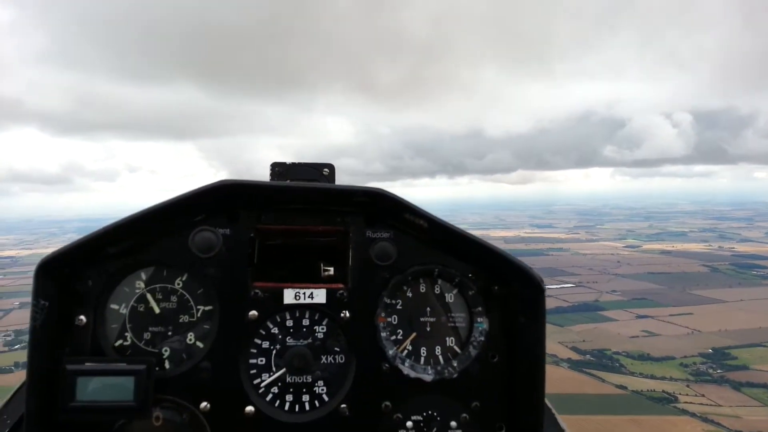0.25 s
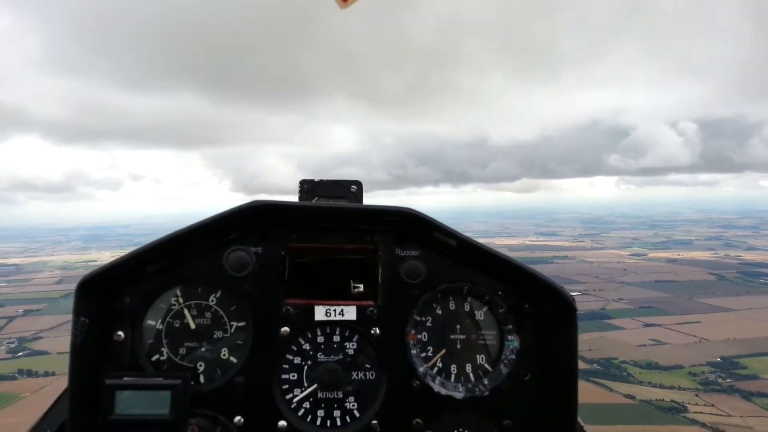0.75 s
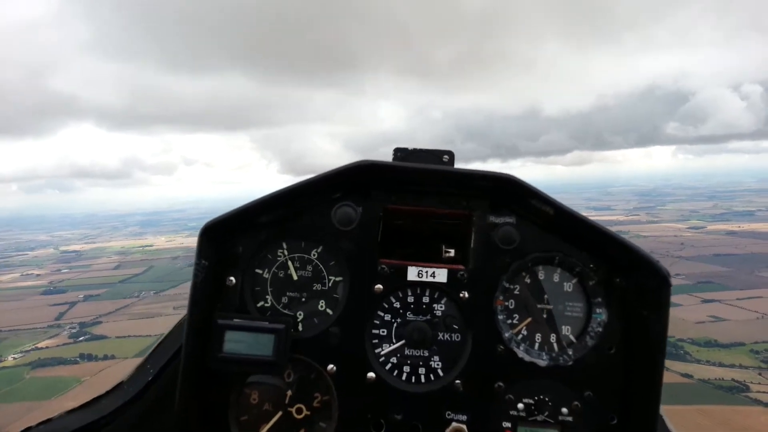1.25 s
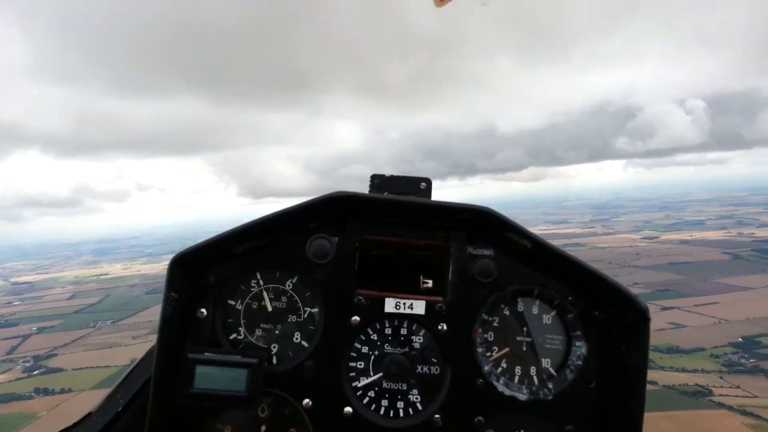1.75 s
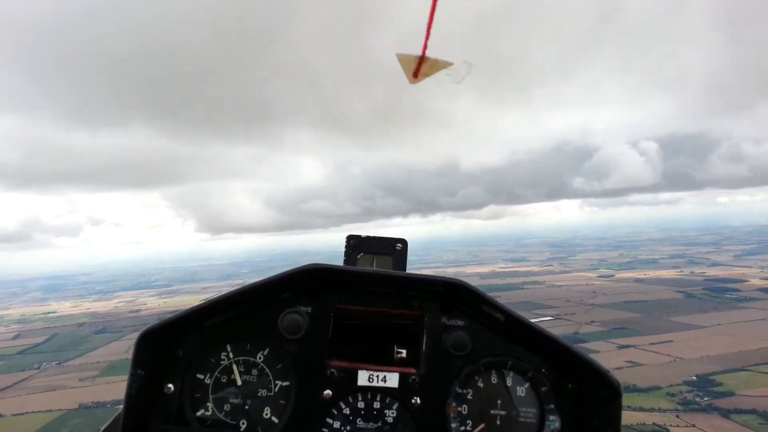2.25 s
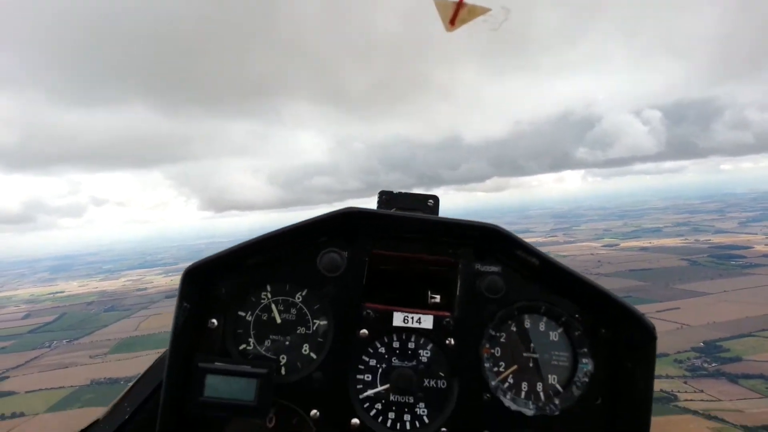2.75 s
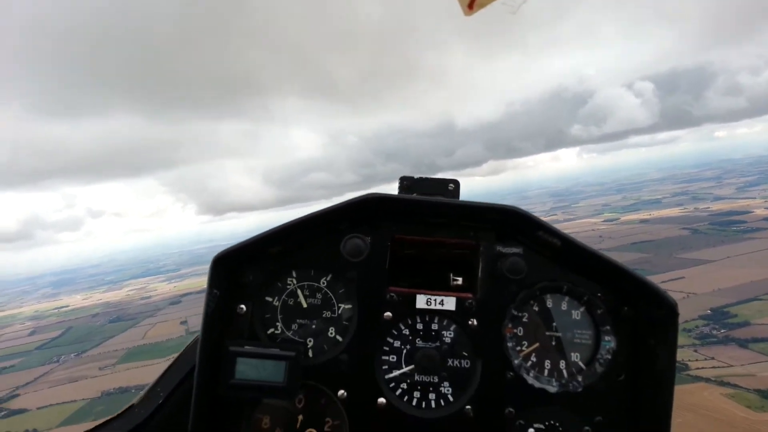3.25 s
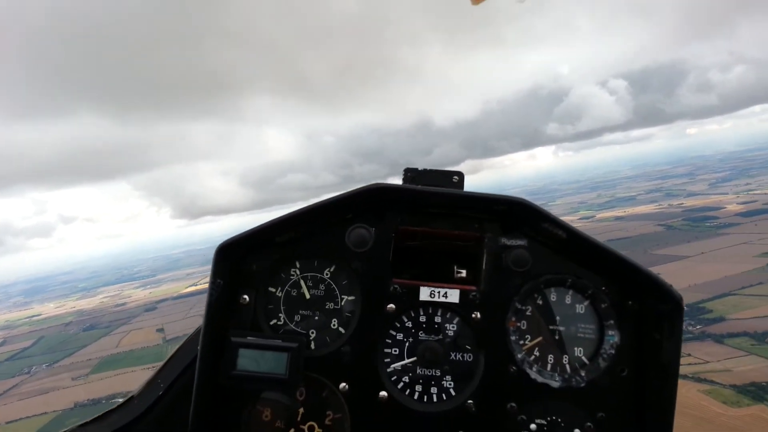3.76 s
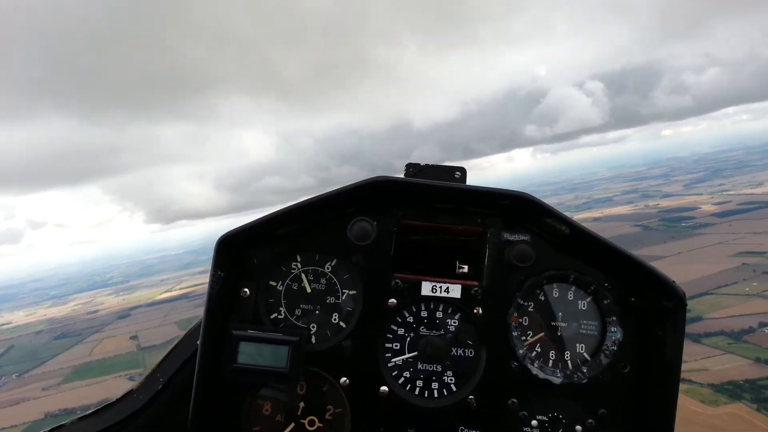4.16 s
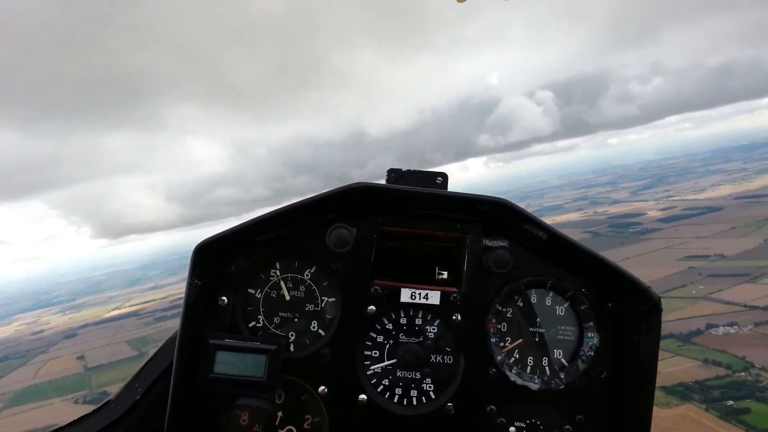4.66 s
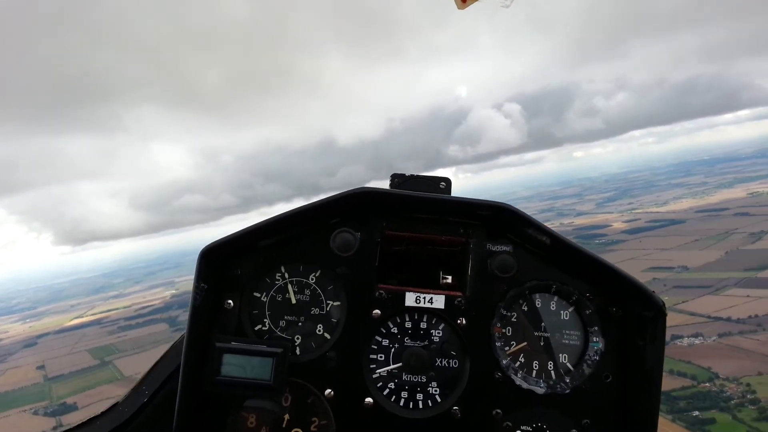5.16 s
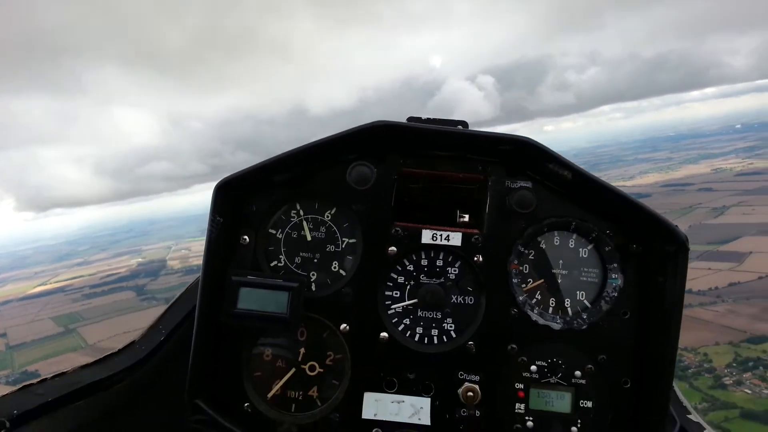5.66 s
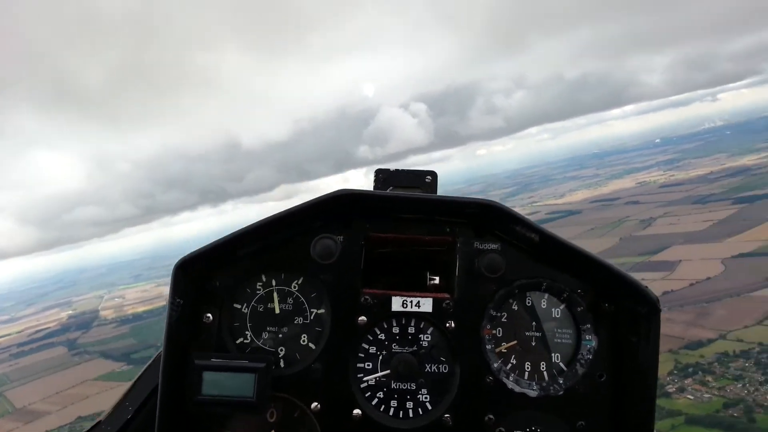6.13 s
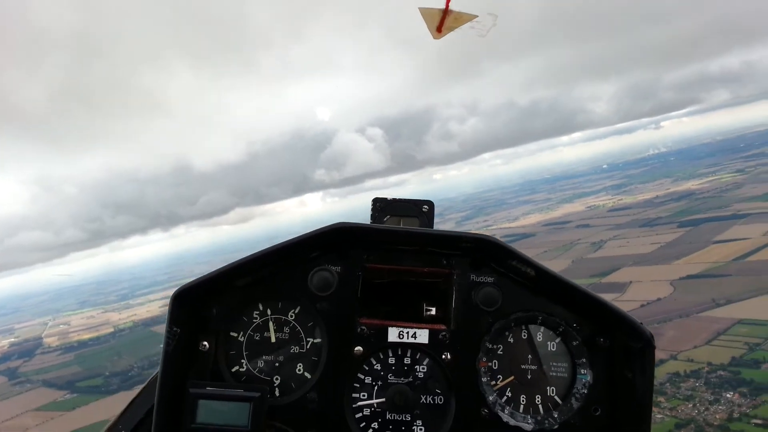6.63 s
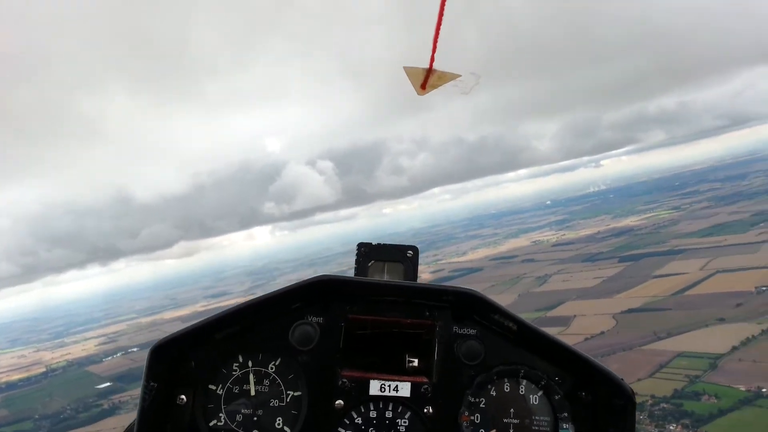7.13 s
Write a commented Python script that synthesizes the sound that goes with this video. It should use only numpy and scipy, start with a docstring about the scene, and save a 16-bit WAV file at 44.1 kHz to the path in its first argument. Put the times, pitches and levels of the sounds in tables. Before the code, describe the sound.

Inside a glider cockpit in a gentle turn, air rushes over the canopy from the first moment to the end, about 7.4 seconds, with no engine. It is a full, turbulent noise, strongest in the mids, with a soft buffeting roar below and a steady hiss from the canopy seals above. Small gusts and brief dips ripple through it, with a clear sag near 2.3 seconds; the rush grows very slightly overall. Underneath, a hollow, breathy low tone around 300 to 400 hertz is weak at first. From about 1.3 to 4.6 seconds it swells in crowded, irregular surges, catching and letting go quickly, then eases to sparse, fainter pulses. The handheld stereo microphones are inside the cabin, close and boxy; as they drift, narrow bands rise and fade, subtly changing the colour between left and right.

```python
"""Inside a glider in a gentle turn: from the start, air rushes over the canopy, turbulent noise shaped
by the cockpit's resonances; the canopy seals hiss.
A hollow low tone, noise ringing in a cavity blown by the slipstream, is weak at first, swells in
crowded surges from about 1.3 s to 4.6 s, then eases to sparser, weaker ones.
Two hand-held microphones hear the air, the right a moment before the left."""
import sys
import numpy as np
from scipy import signal
from scipy.fft import rfft, irfft, next_fast_len
from scipy.io import wavfile
from scipy.ndimage import uniform_filter1d, map_coordinates

SR = 44100
rng = np.random.default_rng(int(sys.argv[2]) if len(sys.argv) > 2 else 0)


def inscribe(sig):
    """Save sig as 16-bit PCM at rate SR to the path in sys.argv[1].

    A 1-D sig is mono; a 2-D sig holds one channel per row.
    Samples are clipped to [-1, 1] before scaling.
    """
    pcm = np.round(np.clip(np.atleast_2d(sig).T, -1, 1) * 32767)
    wavfile.write(sys.argv[1], SR, pcm.astype(np.int16))


N = 325899


def amp(db):
    """Decibels to gain."""
    return 10 ** (np.asarray(db) / 20)


def unit(x):
    """Scale to rms 1."""
    return x / np.sqrt(np.mean(x ** 2) + 1e-20)


def seconds():
    """Time of each sample [s]."""
    return np.arange(N) / SR


def along(points, hz):
    """Read (frequency [Hz], value) points on a log-frequency axis."""
    f, v = np.transpose(points)
    return np.interp(np.log(hz + 1), np.log(f + 1), v)


def curves(rows):
    """One value per sample for each column after the time."""
    times, *columns = np.transpose(rows)
    return [np.interp(seconds(), times, column) for column in columns]


def wobble(knots_per_s):
    """A smooth random curve through normally distributed knots."""
    knots = rng.standard_normal(int(N * knots_per_s / SR) + 4)
    return map_coordinates(knots, [np.arange(N) * knots_per_s / SR])


def filtered(x, response):
    """x times a complex response of frequency; zero padding keeps the tail from wrapping."""
    size = next_fast_len(N + SR // 2)
    spectrum = rfft(x, size) * response(np.fft.rfftfreq(size, 1 / SR))
    return irfft(spectrum, size)[..., :N]


def bell(hz, centre_hz, width_hz):
    """A bell of height 1 with steep skirts."""
    return 1 / (1 + ((hz - centre_hz) / width_hz) ** 2) ** 2


def eddies(patchy_db):
    """Turbulence: two unrelated noises that share small patches of gain in time and frequency."""
    z = signal.stft(rng.standard_normal((2, N)), nperseg=512)[2]
    field = rng.standard_normal(z.shape[1:])
    for axis in (0, 1):
        field = uniform_filter1d(field, size=12, axis=axis)
    return signal.istft(z * amp(patchy_db * unit(field)), nperseg=512)[1][:, :N]


# left-right correlation: (frequency [Hz], likeness [0-1])
LIKENESS = [(60, .5), (180, 0.86), (500, 0.73), (560, 0.26), (660, 0.78), (720, 0), (770, 0.6), (850, 0.4),
            (910, 0.83), (1070, 0.24), (1180, 0.68), (1255, 0.27), (1350, 0.74), (1570, 0.5), (1750, 0.79),
            (1870, 0.34), (2010, 0.8), (2110, 0.36), (2270, 0.65), (2370, .4), (2580, 0.7), (3600, 0.1),
            (6300, 0.53), (10000, 0)]
# phase from standing waves, before the lag: (frequency [Hz], left lead [rad])
STANDING_LEAD = [(150, 0.7), (300, 1), (380, -.5), (500, -0.5), (590, 1), (700, -0.07), (745, 1),
                 (830, -0.54), (865, 2.5), (1200, 2.3), (1270, -0.66), (1520, 1), (1630, -0.3),
                 (1750, 0.74), (1825, -0.25), (1960, 1.5), (2200, -0.47), (2410, 0.8), (2700, 0),
                 (5000, 0.5), (9000, -1)]
LEFT_LAG_S = 0.000408  # left behind right


def microphones(pair):
    """Blend two noises into partly alike channels, the left one late."""
    def mix(hz):
        angle = np.arccos(np.clip(along(LIKENESS, hz), 0, 1)) / 2
        return np.array([np.cos(angle), np.sin(angle)])

    def phase(hz):
        lead = along(STANDING_LEAD, hz) - 2 * np.pi * hz * LEFT_LAG_S
        return np.exp(.5j * np.outer([1, -1], lead))

    common, apart = filtered(pair, mix)
    return filtered(np.array([common + apart, common - apart]), phase)


# airflow heard through the canopy, relative: (frequency [Hz], spectral level [dB])
AIR_SLOPE = [(25, -44), (90, -42), (130, -28.5), (170, -16), (260, -12), (305, -0.5), (450, -5.5),
             (1000, -1.5), (1800, 4.5), (2900, -4), (4200, -6.5), (5300, -8), (6300, -12.5), (7500, -16),
             (9000, -19.5), (10500, -25.5), (14300, -37)]
# cockpit resonances and notches: (centre [Hz], full width [Hz], left lift [dB], right lift [dB])
RESONANCES = [(221.4, 29, 6, 4), (439, 54, 8, 4.5), (537, 68, 6, -1.7), (564, 136, 3.5, 8.5),
              (661, 49, 8, 4.5), (904, 72, 8.5, 9), (1183, 370, -6.5, 6), (1194, 97, 7.5, 4),
              (1254, 116, -2.5, -10), (1340, 48, 4, 5.5), (1385, 42, -1.5, -5), (1494, 110, -3, 2),
              (1707, 52, -4, 2), (1750, 42, -2, 4), (1804, 42, 0, -3), (1888, 170, -5.5, 5),
              (2000, 280, -3, -3), (2280, 70, -2, 3), (2352, 100, -8, -4), (2680, 82, -4, -3.5),
              (2960, 63, 1, -3), (3280, 99, -3, 0.5), (3350, 74, 3.5, 1.5), (4160, 50, 0, 4),
              (4680, 280, -2, 0), (5040, 260, 1, 2), (5250, 115, -0.5, 1)]
# broad balance, split evenly over the channels: (frequency [Hz], left minus right [dB])
BALANCE = [(200, 0), (320, 2), (450, -5), (1000, 6), (1800, 8.9), (2900, 1), (4200, 5), (5300, 9.5),
           (6300, 5), (7500, 3.9), (9000, -0.5), (10000, -8.5), (12000, -14), (14300, -8)]


def cockpit(hz):
    """Gain from airflow to each microphone: a broad slope with the cabin's resonances on it."""
    lift_db = sum(np.outer([left_db, right_db], 1 / (1 + (2 * (hz - centre_hz) / width_hz) ** 2))
                  for centre_hz, width_hz, left_db, right_db in RESONANCES)
    return amp(along(AIR_SLOPE, hz) + lift_db + np.outer([.5, -.5], along(BALANCE, hz)))


# smooth swells of the flow: (peak time [s], full length [s], lift before gust_share [dB])
GUST_ROWS = [(0.32, 0.2, 2.5), (0.665, .05, 0.5), (0.95, 0.1, 1.8), (1.42, 0.3, 2), (2.02, 0.11, 1.5),
             (2.65, .08, 1), (2.8, 0.14, 2), (3.12, 0.24, 0.5), (4.46, 0.16, 1), (4.81, 0.13, 1.5),
             (5.05, .09, 1.5), (5.51, .08, 2.5), (5.67, .14, 1.5), (5.86, .14, 0), (6.08, .09, 1.5),
             (6.26, .09, 1), (6.91, 0.15, 1)]


def gusts():
    """Gusts lift the flow in raised-cosine swells, in dB."""
    t = seconds()
    return sum(db * np.cos(np.pi * np.clip((t - peak_s) / length_s, -.5, .5)) ** 2
               for peak_s, length_s, db in GUST_ROWS)


# sags of the flow: (deepest time [s], sag length [s], depth before gust_share or lull_share [dB])
LULL_ROWS = [(0.63, .12, 3), (0.73, 0.05, 4), (1.09, 0.088, 1.6), (1.84, .06, 0.5), (1.95, 0.12, 1.8),
             (2.35, 0.21, 6.3), (2.44, 0.11, 3), (2.995, 0.1, 4), (3.35, 0.064, 1), (4.69, 0.04, 2),
             (4.98, 0.09, 0.8), (5.14, 0.06, 2), (5.3, 0.046, 1.2), (6.218, 0.11, 3.5), (6.535, .06, 1.6),
             (7.09, 0.09, 1.5)]
RECOVER_S = 0.01


def lulls():
    """How far the flow drops, in dB: a linear sag, then a quick return."""
    t = seconds()
    return sum(np.interp(t, [deep_s - sag_s, deep_s, deep_s + RECOVER_S], [0, db, 0])
               for deep_s, sag_s, db in LULL_ROWS)


# weak draught blowing the cavity under the surges: (time [s], level [dB])
DRAUGHT = [(0, -33), (1.25, -32.5), (2.2, -34.5), (3.3, -30), (4.5, -29), (5.1, -34), (5.7, -30),
           (6.3, -32), (7.39, -29.5)]
# surges of the blowing, added in power: (start [s], length [s], level [dB])
SURGE_ROWS = [(0.23, 0.2, -29.5), (0.734, 0.085, -27.5), (1.302, .11, -30), (1.42, 0.16, -22.5),
              (1.57, .06, -28), (1.693, 0.12, -20), (1.865, 0.051, -20), (1.97, 0.046, -23),
              (2.075, 0.048, -25), (2.24, 0.057, -23), (2.368, 0.15, -22), (2.612, 0.072, -20.5),
              (2.78, 0.19, -26.5), (3.003, 0.22, -22), (3.225, 0.1, -19.5), (3.335, .14, -21.5),
              (3.5, 0.19, -22), (3.76, 0.22, -21.5), (4.018, 0.07, -18.5), (4.242, 0.087, -24),
              (4.36, 0.086, -21.5), (4.47, .11, -26), (4.585, 0.06, -23.5), (5.302, 0.085, -26),
              (5.578, 0.096, -26.5), (6.097, 0.064, -33), (6.544, 0.065, -26), (6.842, 0.14, -27.5)]
SURGE_EDGE_S = 0.0204


def blowing():
    """How hard the cavity is blown, in dB: a draught plus surges that catch and let go quickly."""
    t = seconds()
    draught_db, = curves(DRAUGHT)
    power = amp(draught_db) ** 2
    for start_s, length_s, db in SURGE_ROWS:
        inside_s = np.minimum(t - start_s, start_s + length_s - t)
        power += amp(db) ** 2 * np.clip(.5 + inside_s / SURGE_EDGE_S, 0, 1)
    return 10 * np.log10(power)


# gain of the hiss band: (time [s], level [dB])
TREBLE_LEVEL = [(0, -0.1), (1.4, 0.3), (2.2, -0.15), (4.3, -.8), (5.5, 0.9), (7.39, 0.6)]
FLOW_DB, FLOW_DB_PER_S = -17, 0.145  # starting level, slow rise as the glider turns


def slipstream(roar_db=0.8, rush_db=0.5, roar_hz=640, hiss_hz=3200, flutter_db=0.35, buffet_db=0.8,
               gust_share=0.7, roar_follows=0.11, puff_db=0.24):
    """Turbulence on the canopy: a buffeting roar, the main rush and the seals' hiss on the same gusts."""
    blow_db = blowing()
    treble_db, = curves(TREBLE_LEVEL)
    steady_db = FLOW_DB + FLOW_DB_PER_S * seconds()
    gust_db = gust_share * (gusts() - lulls())
    air = amp(rush_db) * unit(filtered(microphones(eddies(patchy_db=0.37)), cockpit))
    roar = filtered(air, lambda hz: 1 / (1 + (hz / roar_hz) ** 4))
    hiss = filtered(air, lambda hz: 1 - 1 / (1 + (hz / hiss_hz) ** 4))
    rush = air - roar - hiss
    # roar and hiss hold the mean flow level; only the rush takes the slow rise
    shared_db = steady_db.mean() + gust_db
    # the roar also grows with the flow that blows the cavity
    follow_db = roar_follows * (blow_db - blow_db.mean())
    low = roar * amp(shared_db + roar_db + follow_db + buffet_db * wobble(16))
    middle = rush * amp(steady_db + gust_db + puff_db * wobble(15))
    high = hiss * amp(shared_db + treble_db)
    return (low + middle + high) * amp(flutter_db * wobble(30))


# microphone drift in the cockpit: (time [s], sideways [relative], forward [relative])
DRIFT = [(0, 0.89, 0.089), (0.75, 1.1, 0.33), (1.2, -0.48, 0.05), (1.55, -1.1, 0.29), (2.2, 0.6, -0.54),
         (2.55, -0.016, 0.5), (3.35, -0.64, 0.2), (4, -0.75, 0.27), (4.5, -0.67, -0.19),
         (4.95, 0.33, -0.75), (5.7, -0.53, -1.1), (6.05, -0.17, -0.45), (6.4, 0.47, -0.16),
         (7.39, -0.08, 0.33)]
# bands that follow the drift, before width_scale and depth: (centre [Hz], width [Hz],
# left per sideways [dB], right per sideways [dB], left per forward [dB], right per forward [dB])
NODE_BANDS = [(696, 200, -1.5, -2, 1, 1.2), (910, 80, 0, -0.5, 1.2, .8), (1030, 190, -1.3, -0.9, -1.5, 1.7),
              (1177, 109, 0.5, 2.1, 1, 1.2), (1515, 94, 2, 1, -1, -0.84), (1675, 140, 2.8, -0.6, 2.5, 0),
              (1840, 170, 0.5, -0.7, 4, 0), (2000, 202, -3, 1, 0.5, 0.5), (2230, 136, 1.5, -3, -3, -0.16),
              (2488, 180, -3.5, -0.4, -4, 0.4), (2770, 140, -2.5, -4, 0, -1.6),
              (2950, 180, 1.5, 3, 1.2, -0.47), (3170, 219, 2.3, 0.2, 2, 0.1),
              (3400, 202, -3, -0.5, -1, 0.3), (5080, 135, -1, -2, -1.8, -0.8),
              (6659, 918, 1.3, -1.5, 0.5, -0.4)]


def swaying(air, depth=1.08, width_scale=0.57):
    """Drifting through standing waves makes narrow bands rise and fade at each microphone."""
    hz, t, z = signal.stft(air, SR, nperseg=2048)
    sideways, forward = [np.interp(t, seconds(), position) for position in curves(DRIFT)]
    lift_db = 0
    for centre_hz, width_hz, side_l, side_r, fore_l, fore_r in NODE_BANDS:
        band = bell(hz, centre_hz, width_scale * width_hz)[:, None]
        move_db = np.outer([side_l, side_r], sideways) + np.outer([fore_l, fore_r], forward)
        lift_db = lift_db + band * move_db[:, None]
    return signal.istft(z * amp(depth * lift_db), SR, nperseg=2048)[1][:, :N]


def bottom_level(air, below_hz=125, vary_db=4.5, level_db=-1.5):
    """Sets the level of the noise below 125 Hz, with a random gain."""
    bottom = filtered(air, lambda hz: 1 / (1 + (hz / below_hz) ** 8))
    return air - bottom + bottom * amp(level_db + vary_db * wobble(16))


def treble_ripple(air, near_s=0.002014, far_s=.011, slide_s=.00007, gain=0.12, above_hz=2800, count=6):
    """Six faint delayed copies of the treble, their delays sliding with DRIFT, add a fine ripple."""
    sideways = curves(DRIFT)[0]
    treble = filtered(air, lambda hz: hz ** 2 / (hz ** 2 + above_hz ** 2))
    n = np.arange(N)
    copies = np.zeros_like(treble)
    for copy, channel in zip(copies, treble):
        for place, slide in rng.random((count, 2)):
            delay_s = near_s + place * (far_s - near_s) + slide_s * np.cos(np.pi * slide) * sideways
            copy += np.interp(n - SR * delay_s, n, channel, left=0)
    return gain * copies


# cavity air resonances, levels relative:
# (centre [Hz], nominal width [Hz], left [dB], right [dB], left lag [rad])
CAVITY_MODES = [(314.3, 28, -4.5, -9, 0.65), (364, 28, -1.5, -19, 1.62), (389.4, 36.6, 0.5, 3.5, 1.85),
                (740, 17, -10, -13, 1.2)]


def cavity(throb_db=1.0, diffuse=0.21, lull_share=0.55):
    """Turbulence rings the low air resonances: a hollow tone in firm bursts that sinks in each lull."""
    drive = rng.standard_normal(N) + diffuse * rng.standard_normal((2, N))

    def ring(hz):
        total = 0
        for centre_hz, width_hz, left_db, right_db, lag in CAVITY_MODES:
            peak = bell(hz, centre_hz, .5 * width_hz) ** .5 * bell(hz, centre_hz, 2 * width_hz)
            total = total + np.outer([amp(left_db) * np.exp(-1j * lag), amp(right_db)], peak)
        return total

    tone = filtered(drive, ring)
    # level the tone over 1/22 s so that the blowing sets its strength
    strength = np.sqrt(np.abs(uniform_filter1d(np.mean(tone ** 2, axis=0), size=SR // 22)))
    return tone / strength * amp(blowing() - lull_share * lulls() + throb_db * wobble(15))


def scene():
    """The rush of air in the cockpit with the low tone underneath."""
    air = bottom_level(swaying(slipstream()))
    return air + treble_ripple(air) + cavity()


TOP_HZ = 14650


def record(dry):
    """Pickup: the highest peaks are rounded off and nothing passes above the band limit."""
    rounded = dry / (1 + (dry / .95) ** 8) ** (1 / 8)
    return filtered(rounded, lambda hz: hz < TOP_HZ)


dry = scene()
out = record(dry)
inscribe(out)
```